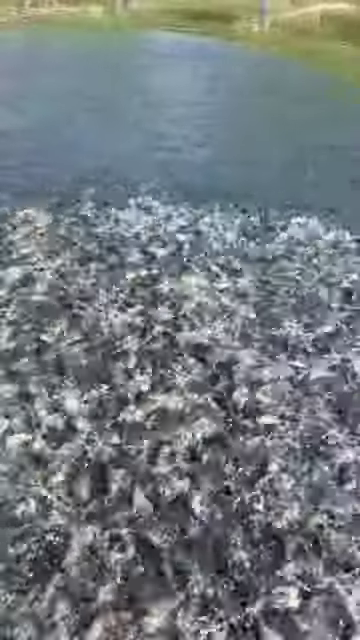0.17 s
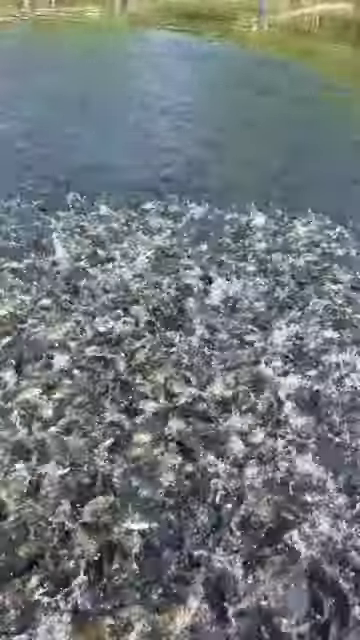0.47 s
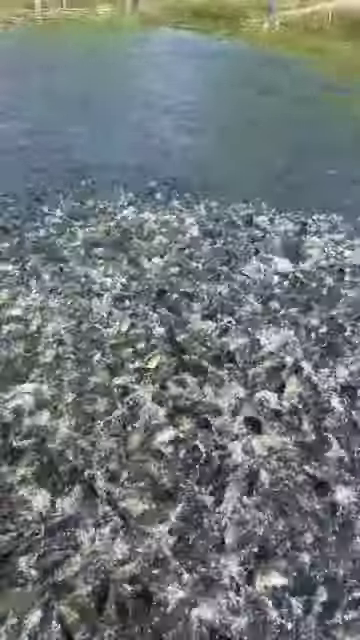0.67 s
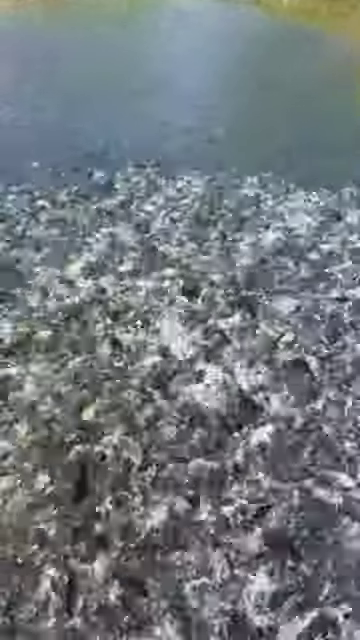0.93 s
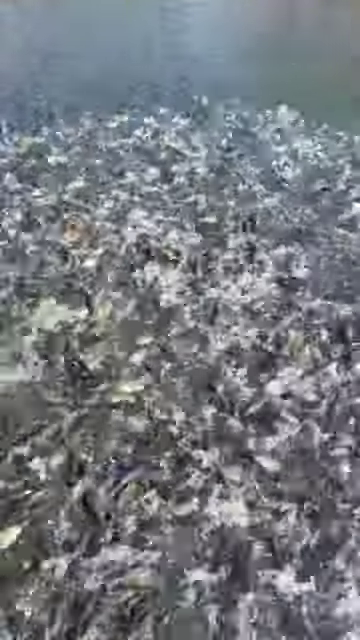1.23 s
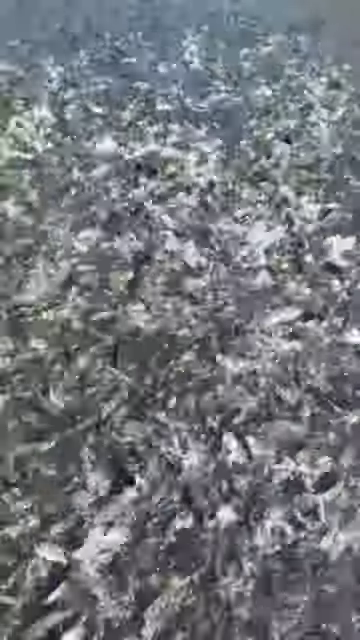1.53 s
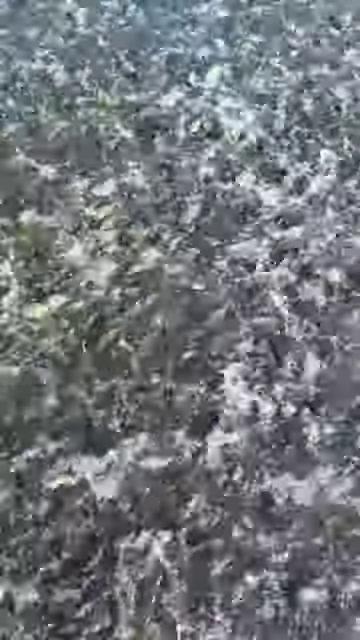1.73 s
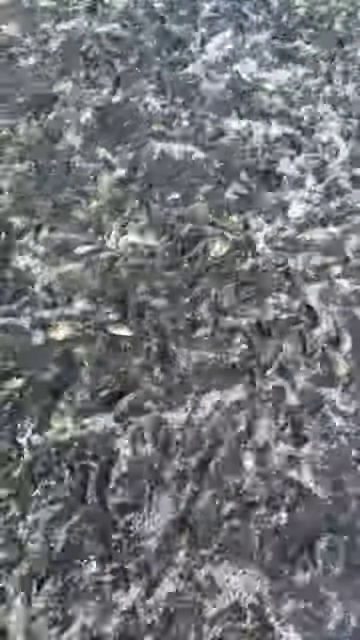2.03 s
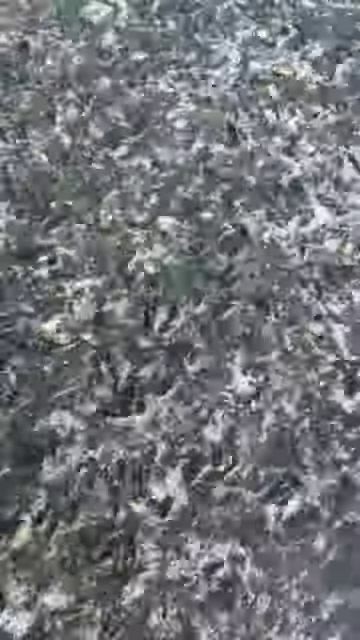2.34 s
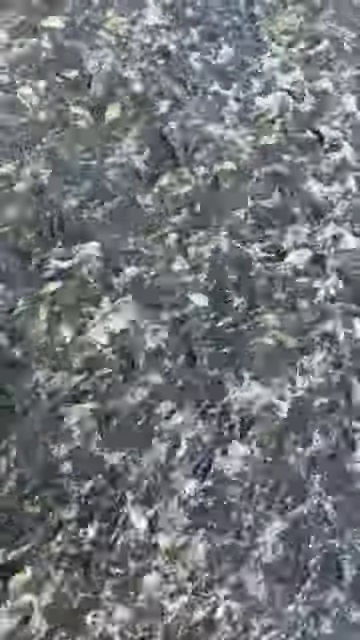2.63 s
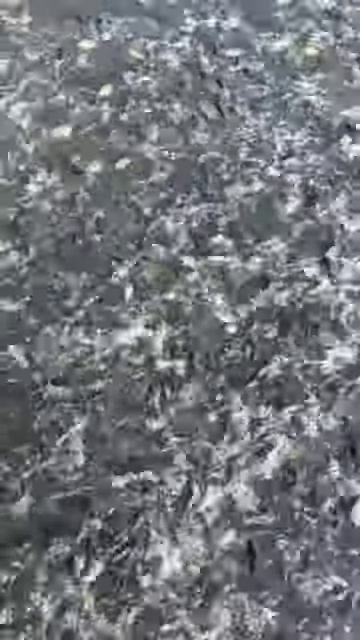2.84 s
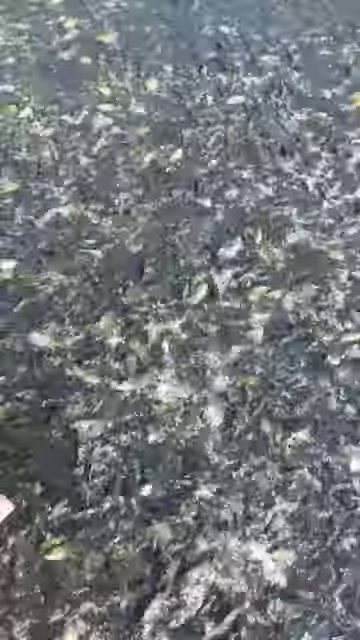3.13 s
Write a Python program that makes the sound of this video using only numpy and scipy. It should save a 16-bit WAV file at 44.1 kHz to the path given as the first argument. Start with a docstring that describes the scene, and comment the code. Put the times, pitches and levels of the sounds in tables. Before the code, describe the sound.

Many fish thrash at a pond surface close to the microphone outdoors. From 0 to 1.3 s a dense, bright wash of spray slowly weakens, with sharp near splashes and high droplet ticks early on. Around 1.36 s it drops quickly to a quieter, uneven churn of wet slaps, bubbles and plips until 3.3 s. Wind rumble and soft thumps, strongest around 0.7-1.25 s, buffet the microphone.

```python
"""A pond outdoors, with the microphone close to a packed shoal of fish thrashing at the surface.
A bright wash of spray dies down and leaves a churn of small slaps and bubbles: shaped noise and
short decaying rings. Nearer splashes and drops are single bursts of noise and tone.
Wind buffets the microphone with low rumble, soft thumps and a wavering flutter."""
import sys
import numpy as np
from scipy import signal
from scipy.fft import rfft, irfft
from scipy.io import wavfile
from scipy.ndimage import uniform_filter1d

SR = 44100
rng = np.random.default_rng(int(sys.argv[2]) if len(sys.argv) > 2 else 0)


def unload_wav(signal):
    """Save mono or channel-first audio to the path in sys.argv[1] as 16-bit WAV at rate SR, clipped to [-1, 1]."""
    wavfile.write(
        sys.argv[1],
        SR,
        np.round(np.clip(np.atleast_2d(signal).T, -1, 1) * 32767).astype(np.int16),
    )


N = 145530  # length in samples


def amp(db):
    """Decibels to gain."""
    return 10 ** (np.asarray(db) / 20)


def unit(x):
    """Scales to rms 1."""
    return x / np.sqrt(np.mean(x ** 2) + 1e-20)


def read(points, hz):
    """Reads a spectrum on a log-frequency axis."""
    f, value = np.transpose(points)
    return np.interp(np.log(hz + 1), np.log(f + 1), value)


def add(mix, s, sound):
    """Mixes a sound in at time s."""
    part = mix[max(round(s * SR), 0):][:len(sound)]
    part += sound[:len(part)]


def tint(x, gain):
    """Filters by one gain for each frequency of the whole signal."""
    return irfft(rfft(x) * gain, N)


def drift(hz):
    """Slow random wandering of rms 1; its spectrum falls off smoothly around hz."""
    return unit(tint(rng.standard_normal(N), np.exp(-(np.fft.rfftfreq(N, 1 / SR) / hz) ** 2)))


def impacts(per_s, spread_db):
    """A random train of clicks of either sign; a larger spread makes a few stand out."""
    size = amp(spread_db * np.minimum(rng.exponential(1, N), 4))
    sign = rng.choice([-1, 1], N)
    return size * sign * (rng.random(N) < per_s / SR)


def burst(hz, decay_s, ring):
    """Water struck once: a puff of noise around hz and the ring of the trapped air."""
    t = np.arange(0, decay_s * 7, 1 / SR)
    edges = [hz / 1.3, min(hz * 1.3, .45 * SR)]
    band = signal.butter(2, edges, "bandpass", fs=SR, output="sos")
    puff = unit(signal.sosfilt(band, rng.standard_normal(len(t))))
    tone = np.sin(2 * np.pi * hz * t)
    ring = np.clip(ring, 0, 1)
    u = t / decay_s
    envelope = (1 - np.exp(-8 * u)) * np.exp(-u)
    return ((1 - ring) * puff + ring * tone) * envelope


# Thrashing of the shoal in three ranges:
# (time [s], body level [dB], splash level [dB], spray level [dB])
THRASH = [(0, -34.5, -28.5, -36.5), (.05, -34.5, -29.5, -33.5), (.12, -34.5, -29.5, -33.5),
          (.2, -37, -31, -34), (.45, -36.5, -33, -36), (.65, -38, -34, -37.5), (.97, -38.7, -35.7, -39.5),
          (1.17, -40.5, -37.5, -42.5), (1.25, -41.5, -37.5, -42), (1.343, -42, -38, -42),
          (1.358, -45.5, -44, -50), (1.42, -47.5, -46.5, -51), (1.72, -44.5, -46.5, -51),
          (1.79, -49, -49, -52), (1.87, -45, -46.5, -49), (2.1, -48.5, -47, -53), (2.38, -48, -49, -52.5),
          (2.46, -45.5, -47, -51), (2.52, -51, -50.5, -55), (2.58, -45, -47, -50), (2.63, -48, -48.5, -50),
          (2.86, -46.5, -45.5, -52), (2.935, -48.5, -49, -52.5), (3.0, -44, -46, -52.5),
          (3.08, -48.5, -46.5, -53), (3.3, -49, -44, -52)]
# Centres of body, splash and spray: (frequency [Hz])
RANGES_HZ = [1500, 3800, 9000]
# Colour of the splashing, relative: (frequency [Hz], level [dB per Hz])
WATER = [(100, -0.5), (300, -4.5), (500, -7.5), (700, -6.5), (900, -3), (1150, -2.5), (1500, -1),
         (2100, -1), (2700, -3.5), (3400, -4.5), (5400, -6.5), (5900, -9.5), (7400, -8.5), (8500, -12),
         (10200, -5), (11800, -4), (13800, -8), (15500, -9.5)]
SETTLE_S = 1.36  # middle of the quick change from dense spray to churn
# layer levels before the thrashing levels: early is the spray, late the churn
WASH_EARLY_DB, WASH_LATE_DB = -3, -5.5
BUBBLE_EARLY_DB, BUBBLE_LATE_DB = -6, -3
SLAP_EARLY_DB, SLAP_LATE_DB = -15, -7.5
PATTER_EARLY_DB, PATTER_LATE_DB = -6, -5.5


def shoal():
    """Wash, bubbles, slaps and patter share one colour and follow the thrashing in three ranges."""
    t, hz = np.arange(N) / SR, np.fft.rfftfreq(N, 1 / SR)
    calm = np.clip((t - SETTLE_S) / 0.048 + .5, 0, 1)  # 0 in the spray, 1 in the churn
    layers = [(wash(), WASH_EARLY_DB, WASH_LATE_DB),
              (bubbles(), BUBBLE_EARLY_DB, BUBBLE_LATE_DB),
              (slaps(), SLAP_EARLY_DB, SLAP_LATE_DB),
              (patter(), PATTER_EARLY_DB, PATTER_LATE_DB)]
    water = sum(x * amp(early + (late - early) * calm) for x, early, late in layers)
    colour = amp(read(WATER, hz))
    times, *levels = np.transpose(THRASH)
    out = np.zeros(N)
    for level, pick in zip(levels, np.eye(len(RANGES_HZ))):
        share = read(list(zip(RANGES_HZ, pick)), hz)  # overlapping ranges that sum to 1
        strength = np.sqrt(np.mean(colour ** 2 * share))
        out += tint(water, colour * share / strength) * amp(np.interp(t, times, level))
    return out


PATCH_DB = 1.5  # rms unevenness of the hiss


def wash():
    """Countless far splashes merge into a hiss with drifting patches."""
    z = signal.stft(rng.standard_normal(N), nperseg=256, noverlap=192)[2]
    patches = uniform_filter1d(rng.standard_normal(z.shape), size=9, axis=0)  # across frequency
    patches = uniform_filter1d(patches, size=10, axis=1)  # across time
    hiss = signal.istft(z * amp(PATCH_DB * unit(patches)), nperseg=256, noverlap=192)[1]
    return unit(hiss[:N])


BUBBLES_PER_S, BUBBLE_SPREAD_DB = 1700, 3
BUBBLE_CYCLES = 12  # typical decay time, in cycles of the starting pitch
BUBBLE_RISE = .025  # pitch rise in each decay time, as a fraction


def bubbles(count=70):
    """Bubbles of many sizes ring briefly and rise in pitch; small ones are the most numerous."""
    out, pitches = np.zeros(N), np.geomspace(450, 15000, count)
    for hz in pitches:
        decay_s = BUBBLE_CYCLES / hz * np.exp(.35 * rng.standard_normal())
        u = np.arange(0, 6 * decay_s, 1 / SR) / decay_s
        phase = 2 * np.pi * np.cumsum(hz * (1 + BUBBLE_RISE * u)) / SR
        ring = np.sin(phase) * np.exp(-u)
        births = impacts(BUBBLES_PER_S * hz / pitches.sum(), BUBBLE_SPREAD_DB)
        out += signal.oaconvolve(births, ring / np.linalg.norm(ring))[:N]
    return unit(out)


SLAPS_PER_S, SLAP_SPREAD_DB = 420, 0.5
SLAP_DECAY_S = 0.004  # typical; varies from one pitch to the next


def slaps(count=36):
    """Fins and tails slap the water in short bursts of noise."""
    out, pitches = np.zeros(N), np.geomspace(700, 9000, count)
    for hz in pitches:
        slap = burst(hz, SLAP_DECAY_S * np.exp(.5 * rng.standard_normal()), 0)
        slap = slap / np.linalg.norm(slap) * np.sqrt(hz)  # higher slaps are stronger
        out += signal.oaconvolve(impacts(SLAPS_PER_S / count, SLAP_SPREAD_DB), slap)[:N]
    return unit(out)


PATTER_PER_S, PATTER_SPREAD_DB = 800, 0  # rate where the shower density is 1
PATTER_DECAY_S = .0009  # typical; varies among the kinds of tick
SHOWERS_HZ, SHOWER_DEPTH_DB = 22, 4  # speed and rms depth of the clumping


def patter(count=24):
    """Thrown droplets fall back in small showers of crisp ticks."""
    density = unit(amp(SHOWER_DEPTH_DB * drift(SHOWERS_HZ)))
    out = np.zeros(N)
    for _ in range(count):
        decay_s = PATTER_DECAY_S * np.exp(.5 * rng.standard_normal())
        u = np.arange(0, 6 * decay_s, 1 / SR) / decay_s
        tick = rng.standard_normal(len(u)) * np.exp(-u)
        landings = impacts(PATTER_PER_S * density / count, PATTER_SPREAD_DB)
        out += signal.oaconvolve(landings, tick / np.linalg.norm(tick))[:N]
    return unit(out)


def close_hits(rows, decay_s, ring, crack, gain_db):
    """Hits near enough to be heard one by one, each with a broad crack as the surface breaks."""
    out = np.zeros(N)
    for s, db, hz in rows:
        hit = burst(hz, decay_s, ring)
        fade = np.exp(-2 * np.arange(len(hit)) / SR / decay_s)
        hit = hit + crack * rng.standard_normal(len(hit)) * fade
        add(out, s, amp(db + gain_db) * hit / abs(hit).max())
    return out


# Splashes close to the microphone: (time [s], peak level before gain_db [dB], pitch [Hz])
SPLASHES = [(.257, -16, 4700), (.609, -12.5, 4360), (.687, -29, 2450), (1.235, -19, 4040),
            (1.393, -26, 5160), (1.535, -25, 3470), (1.63, -25, 1520), (1.714, -30.5, 1900),
            (1.843, -25, 3250), (1.854, -22, 6400), (2.007, -27, 3450), (2.054, -25, 3400),
            (.042, -10, 3200), (2.1755, -22.5, 2470), (2.287, -31, 1080), (2.314, -25, 3030),
            (2.412, -19, 2690), (2.48, -32, 2120), (2.577, -26, 4150), (2.653, -24.5, 5580),
            (2.76, -26.5, 3670), (2.841, -30, 2000), (2.866, -27, 6100), (2.88, -24, 4000),
            (2.894, -23.5, 3440), (2.955, -26.5, 5060), (2.983, -23, 3270), (2.9945, -23, 2310),
            (3.24, -28, 3050)]


def splashes():
    """Close splashes: about half ring, half noise, with a faint crack."""
    return close_hits(SPLASHES, decay_s=0.0026, ring=0.54, crack=0.067, gain_db=-7)


# Drops landing beside the microphone: (time [s], peak level before gain_db [dB], pitch [Hz])
DROPS = [(.085, -13, 12800), (.3557, -5.5, 11700), (1.2075, -20.5, 11900), (1.224, -17, 9900),
         (1.517, -30, 10400), (1.843, -23.5, 11300), (1.8785, -23, 8800), (1.8808, -18, 10300),
         (1.98, -27, 10900), (2.2275, -23, 11000)]


def drops():
    """Drops tick high and short: mostly ring, with a stronger crack."""
    return close_hits(DROPS, decay_s=0.00072, ring=0.77, crack=0.36, gain_db=-3)


# Wind rumble at the microphone: (time [s], level [dB])
WIND = [(0, -46), (.07, -31.5), (.12, -38), (.3, -34.5), (.39, -40.5), (.6, -40), (.7, -35.5), (.77, -43),
        (.82, -29.5), (.88, -29.5), (.97, -33), (1.04, -35), (1.1, -33.5), (1.26, -35), (1.35, -40),
        (1.42, -51), (1.62, -41), (1.7, -49), (1.97, -41.5), (2.09, -42.5), (2.2, -36.5), (2.3, -46),
        (2.5, -47.5), (2.85, -40), (2.96, -43), (3.08, -45), (3.16, -45), (3.26, -37), (3.3, -43)]
# Colour of the rumble, relative: (frequency [Hz], level [dB])
RUMBLE = [(20, -37), (48, 0.5), (90, 4), (135, 1.5), (190, -6.5), (255, -10), (320, -14.5), (420, -21),
          (600, -39), (1000, -58), (3000, -82)]
# Single eddies that hit the microphone, levels before its bass loss:
# (time [s], peak level [dB], width [s], flutter level [dB])
EDDIES = [(0.067, -20, 0.0043, -23.5), (.324, -25.5, 0.0035, -32), (.49, -25.5, 0.0046, -43.5),
          (.701, -22, .003, -31.5), (.808, -21, 0.004, -31.5), (0.822, -18, .0017, -36),
          (0.898, -24, .003, -35), (0.964, -19.5, 0.0018, -31), (.9795, -19.5, 0.0029, -32),
          (0.992, -19, 0.0046, -44), (1.058, -20, 0.0048, -46), (1.086, -15.5, 0.002, -25.5),
          (1.11, -13, 0.0044, -34.5), (1.124, -23.5, 0.0015, -25), (1.191, -21, 0.0058, -49),
          (1.2253, -15.5, .0026, -35), (1.465, -28, 0.0049, -47), (1.758, -26.5, 0.0032, -37.5),
          (1.878, -29, 0.0036, -45), (1.9985, -26, 0.002, -50), (2.007, -25, 0.0022, -38),
          (2.042, -18, 0.0036, -42), (2.108, -23.5, 0.0033, -52), (2.145, -34, 0.0021, -58),
          (2.168, -15.5, .0024, -39), (2.359, -27, 0.0054, -45), (2.384, -25, 0.0043, -45),
          (2.752, -29, 0.005, -61), (2.807, -28.5, 0.0047, -42), (2.928, -32, 0.0036, -43.5),
          (3.022, -28, 0.0037, -42.5), (3.117, -25, 0.0044, -50), (3.186, -28, 0.0027, -46)]
# turbulence around each eddy: centre pitch, rms wander in octaves, time scale of its swell
FLUTTER_HZ, FLUTTER_WANDER_OCT, FLUTTER_S = 226, .25, .007
MIC_LOW_HZ = 50  # the microphone loses the eddies' bass below this
RUMBLE_LUMP_DB, LUMPS_HZ = 1.5, 25  # rms depth and speed of the rumble's unevenness


def wind():
    """Lumpy rumble; each eddy is a pressure dip that rebounds in the microphone, with a flutter."""
    t, hz = np.arange(N) / SR, np.fft.rfftfreq(N, 1 / SR)
    rumble = tint(rng.standard_normal(N), amp(read(RUMBLE, hz)))
    rumble = unit(rumble * amp(RUMBLE_LUMP_DB * drift(LUMPS_HZ)))
    pitch = FLUTTER_HZ * 2 ** (FLUTTER_WANDER_OCT * drift(.5 / FLUTTER_S))
    flutter = np.sin(2 * np.pi * np.cumsum(pitch) / SR)
    eddies = np.zeros(N)
    for s, db, width_s, flutter_db in EDDIES:
        u = (t - s) / width_s
        dip = (1 - 3 * u ** 2) / (1 + u ** 2) ** 3
        swell = 1 / np.cosh(np.minimum(abs(t - s) / FLUTTER_S, 20))
        eddies += amp(flutter_db) * flutter * swell - amp(db) * dip
    eddies = signal.lfilter(*signal.butter(1, MIC_LOW_HZ, "highpass", fs=SR), eddies)
    return eddies + rumble * amp(np.interp(t, *np.transpose(WIND)))


def scene():
    """The shoal, its nearest splashes and drops, and the wind, on one microphone."""
    return (shoal() + splashes() + drops() + wind())[None]


EDGE_HZ = 15880  # top of the recorder's band


def record(dry):
    """The recorder's band limit: a steep low-pass filter."""
    lowpass = signal.firwin(511, EDGE_HZ, window=("kaiser", 9), fs=SR)
    return signal.oaconvolve(dry, lowpass[None], "same")


dry = scene()
out = record(dry)
unload_wav(out)
```